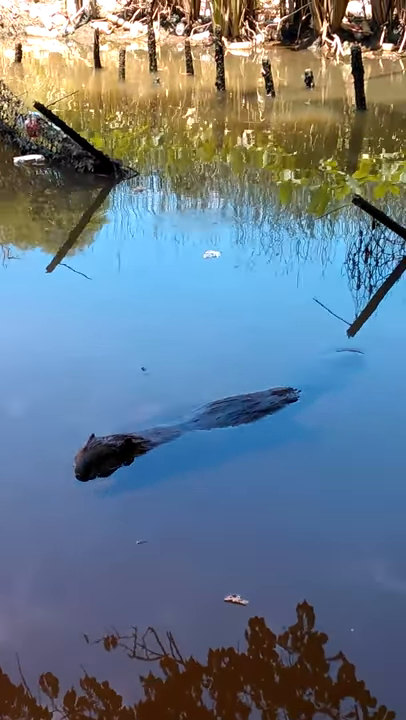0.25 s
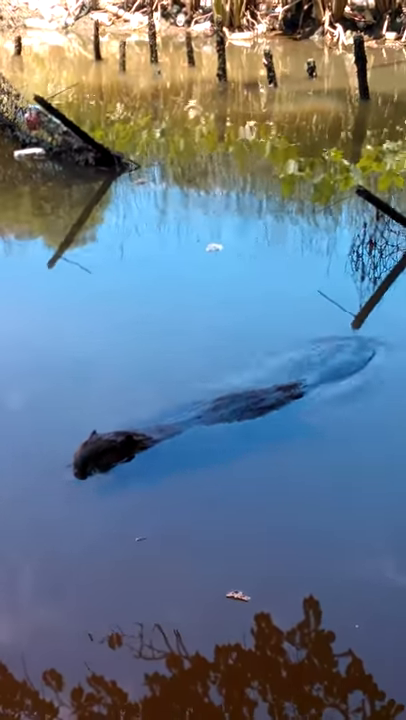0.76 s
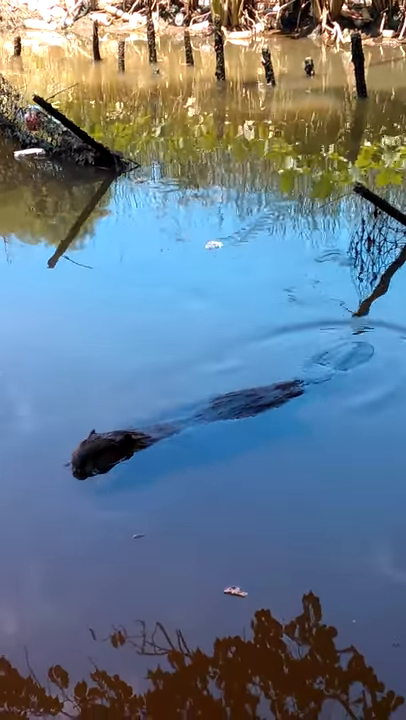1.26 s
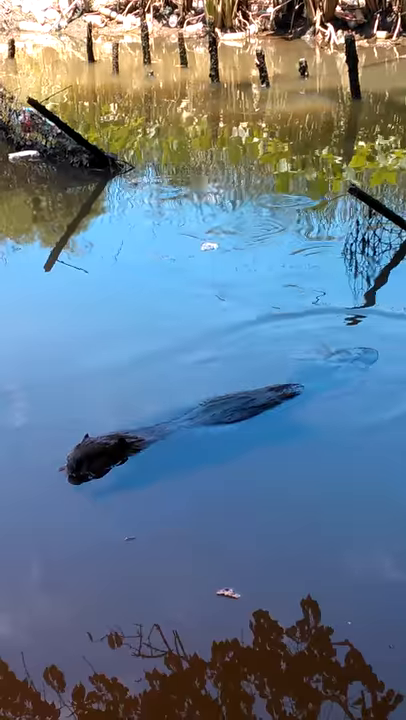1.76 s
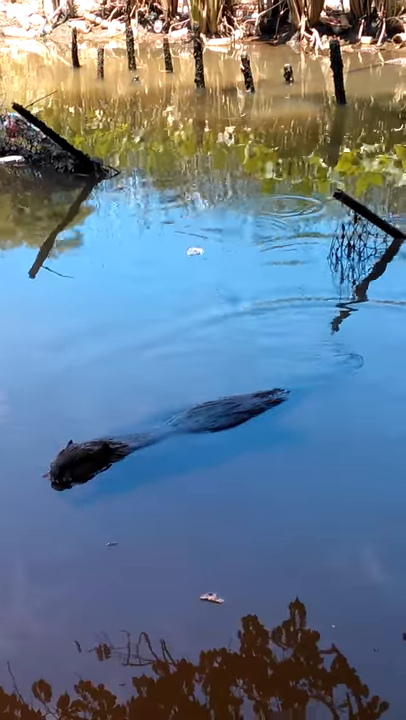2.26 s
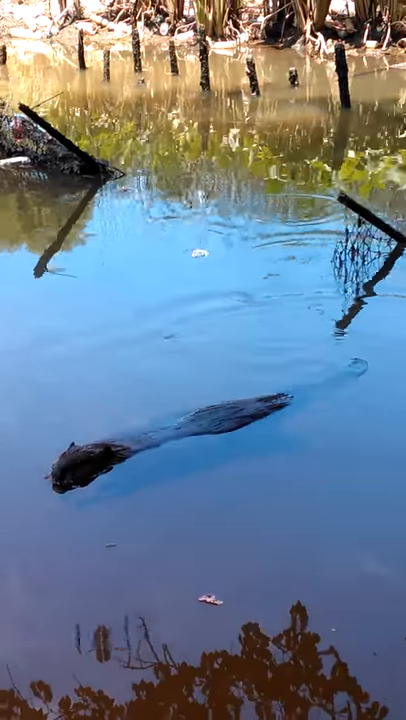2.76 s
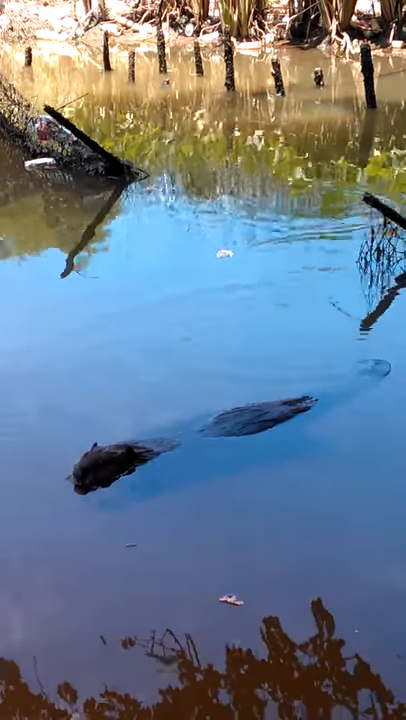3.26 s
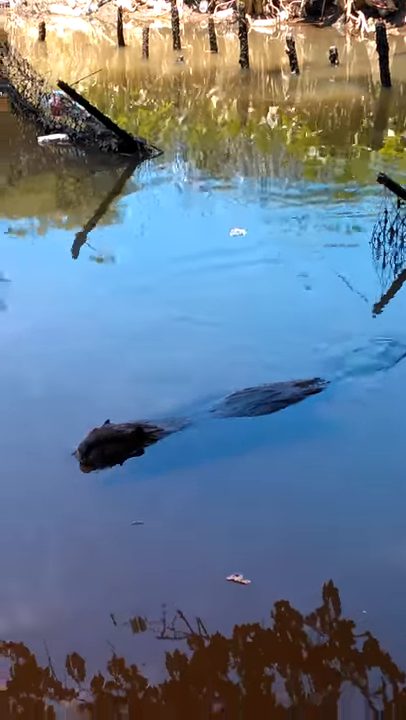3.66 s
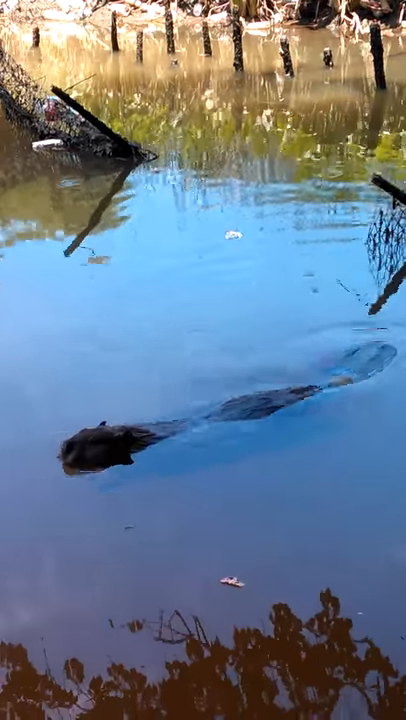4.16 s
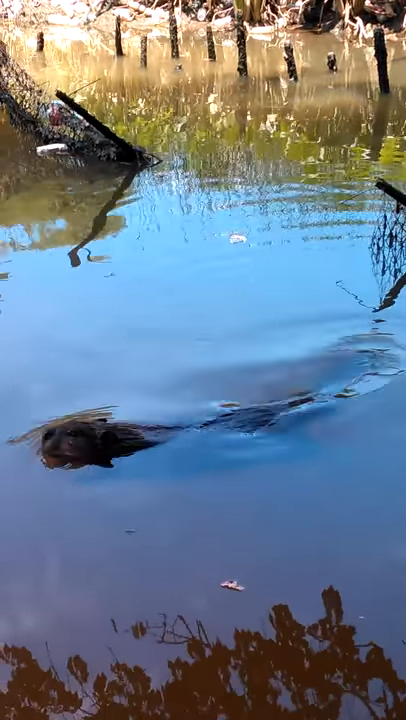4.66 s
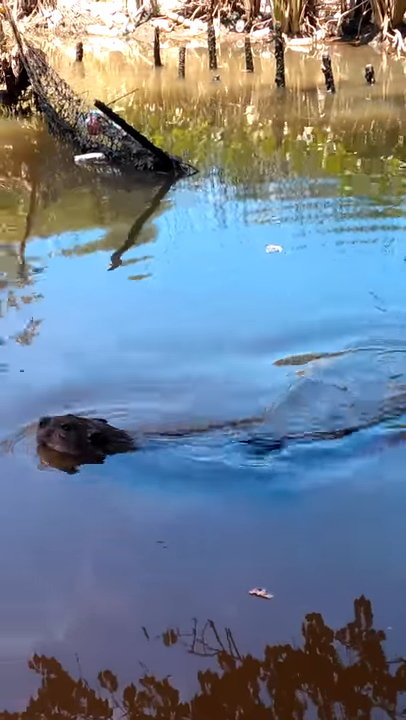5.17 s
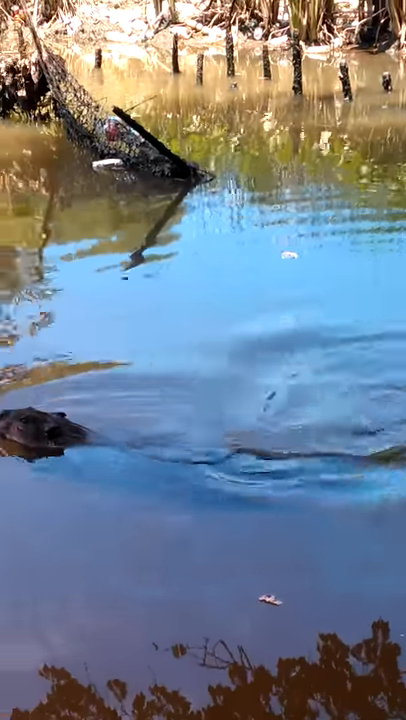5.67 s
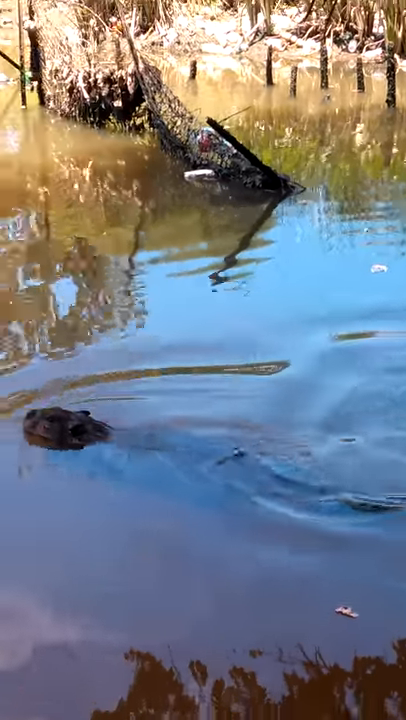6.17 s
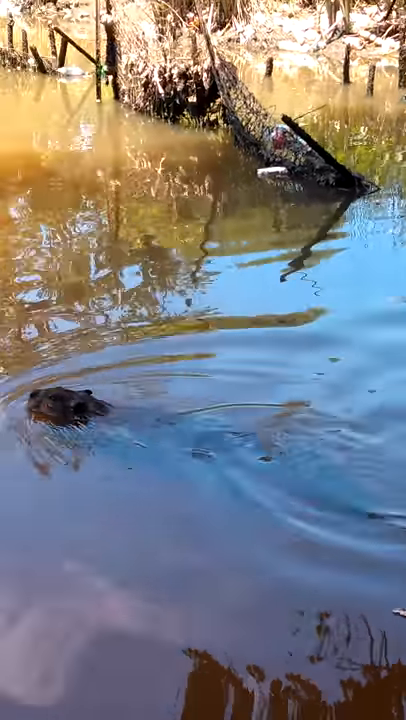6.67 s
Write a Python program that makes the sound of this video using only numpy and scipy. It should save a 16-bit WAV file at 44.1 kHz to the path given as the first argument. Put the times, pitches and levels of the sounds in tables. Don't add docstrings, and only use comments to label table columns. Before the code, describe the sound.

Far traffic drones deeply beside a quiet pond while small birds whistle, chirp and trill faintly, and a finger clatters the phone's case.

```python
import sys
import numpy as np
from scipy import signal
from scipy.fft import rfft, irfft, next_fast_len
from scipy.io import wavfile
from scipy.ndimage import uniform_filter1d

SR = 44100
rng = np.random.default_rng(int(sys.argv[2]) if len(sys.argv) > 2 else 0)


def master_out(mix):
    frames = np.transpose(np.atleast_2d(mix))
    ceiling = np.clip(frames, -1, 1)
    pcm = np.round(ceiling * 32767).astype(np.int16)
    wavfile.write(sys.argv[1], SR, pcm)


def elevation(decibels):
    levels = np.asarray(decibels, float)
    return 10 ** (levels / 20)


N = 305172
T = np.arange(N) / SR


def walk(rate):
    hold = int(SR / rate)
    steps = np.repeat(rng.standard_normal(N // hold + 1), hold)
    return 2.14 * uniform_filter1d(uniform_filter1d(steps, hold), hold)[:N]


def noise(points):
    size = next_fast_len(N)
    hz, db = np.transpose(points)
    bins_hz = np.arange(size // 2 + 1) * SR / size
    gain = elevation(np.interp(np.log(bins_hz + 1), np.log(hz), db))
    y = irfft(rfft(rng.standard_normal(size)) * gain, size)[:N]
    return y / y.std()


# [f/Hz, level/dB per Hz]
HISS = [(1530, -17.5), (2600, -1), (3350, -0.5), (4450, -6), (8650, -4.5), (9900, -10), (14500, -13.5),
        (15500, -11)]


def microphone_hiss():
    return elevation(-61 + 0.033 * walk(1.8)) * noise(HISS)


# [f/Hz, level/dB per Hz]
ROAD_COLOUR = [(15, -30), (25, -23), (53, -1), (80, -2.5), (144, -11), (178, -14.5), (238, -16), (594, -30),
               (842, -29.5), (1000, -24.5), (1130, -24.5), (1340, -27), (2060, -39), (2600, -44), (3380, -57),
        (5720, -120)]


def road():
    whole = noise(ROAD_COLOUR)
    low_pass = signal.butter(2, 450, fs=SR, output="sos")
    low = signal.sosfilt(low_pass, whole[::-1])[::-1]
    low = signal.sosfilt(low_pass, low)
    swell = elevation(0.11 * walk(1.47))
    leaving_db = 1.5 * np.exp(-T / 2.1)
    extra = elevation(leaving_db - 1.2 + 0.6 * walk(2.86))
    return elevation(-39) * swell * (whole - low + extra * low)


def pull(loudest, heard, hz, climb_hz, db, fall_db):
    away = np.linspace(-1, 1, num=21)
    fall = fall_db * np.abs(away) ** 3.4
    return np.transpose([loudest + heard * away, hz + climb_hz * heard * away, db - fall])


def hum(track, orders, flutter_db):
    s, hz, db = np.transpose(track)
    turn = 2 * np.pi * np.cumsum(np.interp(T, s, hz)) / SR
    rise = T - s[0] + (s[0] == 0)
    fall = s[-1] - T + (s[-1] > 6.85)
    fade = np.clip(np.minimum(rise, fall) / 0.12, 0, 1)
    lines = sum(elevation(g + flutter_db * walk(6)) * np.sin(k * turn + rng.uniform(0, 2 * np.pi)) for k, g in orders)
    return np.sqrt(2) * lines * fade * elevation(np.interp(T, s, db))


# [loudest at t/s, heard before and after t/s, f/Hz, climb f/Hz per s, level/dB]
WHINES = [(.22, .42, 145, 10, -43), (4.35, .5, 130.8, 1, -47), (5.4, .6, 131, 0, -50),
          (5.1, .9, 228.5, 0, -57), (6.25, .6, 533, -8, -63.5), (1.9, .55, 134, 0, -53),
          (1.4, .35, 110, 0, -54), (3.0, .45, 136, 0, -52), (3.2, .78, 159, 2, -54),
          (2.55, .4, 248.5, 3, -57), (4.3, .5, 261, 6, -60), (5.05, .22, 528, 9, -65),
          (5.75, .4, 238.5, -5, -60), (6.85, .6, 241, 8, -50.5), (6.4, .35, 587, 25, -63)]


def whines():
    return sum(hum(pull(*w, fall_db=7), [(1, 0)], flutter_db=1.8) for w in WHINES)


# [loudest at t/s, heard before and after t/s, firing f/Hz, climb f/Hz per s, level/dB]
PULLS = [
    (.28, .66, 72.8, 6.5, -36),
    (2.4, .9, 69.4, 1.9, -40),
    (2.95, .8, 73.4, 2.4, -42),
    (4.8, 1.1, 76.6, 1.1, -39),
    (6.3, .62, 78.4, 1.9, -38),
    (2.6, .8, 62.9, 1.6, -41),
    (4.7, 1.05, 69.7, 5.7, -33.8),
    (2.5, 1.1, 58.7, 0, -45.5),
    (1.3, .5, 81, 0, -45),
    (3.6, .35, 63, 3, -44),
]
# [t/s, firing f/Hz, level/dB]
LORRY = [
    (5.8, 65.9, -30),
    (6.0, 67.5, -47.5),
    (6.25, 67.8, -40),
    (6.92, 68.53, -38),
]
# [multiple of the firing rate, level/dB]
LORRY_ORDERS = [(1, 2.5), (1.5, -6), (2, -12.5), (2.5, -19.5), (3, -15.5), (4, -19), (4.5, -19.5), (5, -35),
                (6, -25.5)]


def engines():
    far = sum(hum(pull(*p, fall_db=9), [(1, 0.014)], flutter_db=0.1) for p in PULLS)
    return far + hum(LORRY, LORRY_ORDERS, flutter_db=0.0)


# [t/s, peak level/dB, ring f/Hz, ring width f/Hz]
TICKS = [(2.3746, -52, 12000, 5000), (3.6203, -49, 9100, 5960), (5.0785, -40, 3600, 2520),
         (5.0788, -45, 8800, 3000), (5.1033, -47, 5540, 2485), (5.1236, -35, 6500, 3500),
         (5.1253, -34.5, 4500, 5000), (5.1252, -37, 9400, 6000), (5.1276, -48, 5000, 2500),
         (5.1318, -46, 7000, 5000), (5.194, -54, 3000, 1500), (5.329, -51, 11030, 2970),
         (5.8118, -49, 10810, 5000), (6.36, -47, 10000, 6040), (6.468, -54, 4500, 3000),
         (6.5117, -46, 12000, 2490)]
# [t/s, length t/s, level/dB]
RUBS = [
    (5.11, 0.1, -64),
    (6.364, 0.18, -69),
]


def handling():
    ticks, lag = np.zeros(N), np.arange(200) / SR
    for s, db, hz, width_hz in TICKS:
        i, u = int(s * SR), np.pi * width_hz * lag
        push = 4.1 * u * np.exp(-u)
        ticks[i:i + 200] += elevation(db) * push * np.sin(2 * np.pi * hz * lag)
    rattle = elevation(-27) * rng.standard_normal(400) * np.exp(-np.arange(400) / SR / 0.0015)
    grains = noise([(3000, -30), (7000, -6), (9000, 0), (12000, -3), (15000, -8)]) * elevation(1.5 * walk(120))
    strokes = 0
    for s, length, db in RUBS:
        strokes += elevation(db) * np.abs(np.sin(np.pi * np.clip((T - s) / length, 0, 1))) ** 0.5
    return ticks + signal.fftconvolve(ticks, rattle)[:N] + grains * strokes


def sing(phrase, events):
    return [(s + delay * np.prod(slow), length * np.prod(slow), k * hz0, k * hz1, k * hz2, db + g)
            for s, k, db, *slow in events
            for delay, length, hz0, hz1, hz2, g in phrase]


def bird(strokes, wobble_hz, octave_db, wet_db, t60):
    y = np.zeros(N + SR)
    jitter = signal.sosfilt(signal.butter(2, 400, fs=SR, output="sos"), rng.standard_normal(N + SR))
    jitter *= wobble_hz / jitter.std()
    for s, length, hz0, hz1, hz2, db in strokes:
        i, n = int(s * SR), int(length * SR)
        u = np.arange(n) / n
        hz = hz0 * (1 - u) * (1 - 2 * u) + hz1 * 4 * u * (1 - u) + hz2 * u * (2 * u - 1)
        turn = 2 * np.pi * np.cumsum(hz + jitter[i:i + n]) / SR
        swell = 1.79 * np.sin(np.pi * u) ** 0.3
        y[i:i + n] += elevation(db) * swell * (np.sin(turn) + elevation(octave_db) * np.sin(2 * turn))
    lag = np.arange(SR // 2) / SR
    echo = rng.standard_normal(len(lag)) * np.exp(-np.log(1000) * lag / t60) * (lag > 0.004)
    echo *= elevation(wet_db) / np.sqrt(np.sum(echo ** 2))
    return y[:N] + signal.fftconvolve(y[:N], echo)[:N]


# [t/s, length t/s, start f/Hz, end f/Hz, level/dB]
CHUCKS = [(2.105, .018, 3200, 3080, -66), (2.12, 0.018, 3460, 2400, -62), (2.141, .018, 3200, 3100, -68),
          (2.255, 0.018, 2900, 2900, -72), (2.283, 0.021, 3180, 3020, -63), (3.49, 0.022, 1980, 1850, -60),
          (3.832, .016, 3620, 3000, -64), (3.936, .028, 3800, 4260, -69), (4.027, 0.03, 3930, 4150, -69),
          (5.843, 0.026, 2070, 1900, -60), (6.878, .02, 3800, 3183, -67), (6.879, 0.026, 3120, 2780, -60),
          (6.887, 0.029, 3570, 2610, -61)]


def chucks():
    strokes = [(s, length, hz0, (hz0 + hz2) / 2, hz2, db) for s, length, hz0, hz2, db in CHUCKS]
    return bird(strokes, wobble_hz=200, octave_db=-35, wet_db=-1, t60=0.35)


# [delay t/s, length t/s, start f/Hz, middle f/Hz, end f/Hz, level/dB]
SLUR = [
    (0, .095, 3440, 3210, 3240, 0),
    (.085, 0.1, 3210, 3360, 3455, -4.5),
]
LEAD_IN = [(0, 0.0444, 3560, 3540, 3420, 0)]
# [t/s, pitch factor, level/dB, length factor]
WHISTLES = [
    (.148, .99, -62, 0.97),
    (1.76, 1, -64, 0.88),
    (3.93, 1.02, -62, 0.97),
    (5.38, 1.005, -61, .92),
    (6.52, 1.01, -74, 0.91),
]
# [t/s, pitch factor, level/dB]
LEAD_INS = [
    (1.72, 1, -70),
    (3.895, 1, -68),
    (5.348, 0.997, -62.5),
]


def whistler():
    strokes = sing(SLUR, WHISTLES) + sing(LEAD_IN, LEAD_INS)
    return bird(strokes, wobble_hz=20, octave_db=-35, wet_db=-1, t60=0.42)


# [delay t/s, length t/s, start f/Hz, middle f/Hz, end f/Hz, level/dB]
TRILL_NOTE = [(0, 0.0307, 2800, 2850, 3100, 0)]
DIP = [(0, 0.0275, 2200, 2150, 2180, 0)]
# [t/s, pitch factor, level/dB]
DIPS = [
    (3.62, 1, -62),
    (3.75, 1, -64),
    (3.851, 1.17, -60),
]
TRILL = [(3.944, 1.01, -60), (4.046, 1.04, -62), (4.15, .98, -61), (4.249, 1.02, -62), (4.345, 1.03, -59),
         (4.448, 1.07, -60.5), (4.558, 1.025, -62.5), (4.665, 1.015, -64.5), (4.785, 1.04, -63.5)]


def warbler():
    strokes = sing(TRILL_NOTE, TRILL) + sing(DIP, DIPS)
    return bird(strokes, wobble_hz=80, octave_db=-35, wet_db=2, t60=0.5)


# [delay t/s, length t/s, start f/Hz, middle f/Hz, end f/Hz, level/dB]
TSIP = [
    (0, .025, 5150, 5320, 5580, -7),
    (.002, 0.0305, 5860, 6050, 6200, -17),
    (.004, .031, 6220, 7140, 7800, -1),
]
ARC = [
    (0, .082, 6070, 5984, 5020, -0.5),
    (.01, 0.046, 7180, 7400, 7160, -8),
]
DOUBLE_TSIP = [
    (0, 0.033, 5520, 5700, 5700, 1),
    (.004, 0.035, 5970, 6460, 7050, -2),
]
DOUBLE_ARC = [
    (.028, .062, 5780, 5940, 5150, 1),
    (.035, 0.037, 6500, 6550, 6370, -2.5),
    (.08, .058, 6200, 6000, 5100, 0.5),
]
# [t/s, tsip pitch factor, tsip level/dB, arc after t/s, arc level/dB]
FAR_CHIRPS = [
    (.836, 1.07, -61, 0.036, -61),
    (1.365, .99, -63, 0.048, -65),
]
NEAR_CHIRPS = [
    (4.258, 1, -57.5, .045, -58.5),
    (6.358, 1, -57, .05, -58),
]
# [t/s, pitch factor, level/dB]
DOUBLE_CHIRPS = [
    (2.673, .995, -65),
    (5.157, 1.005, -65.5),
]
HOARSE_TSIPS = [(0.828, 1.01, -61)]


def arcs(phrase, chirps):
    return sing(phrase, [(s + after, 1, db) for s, _, _, after, db in chirps])


def sparrows():
    tsips = sing(TSIP, [chirp[:3] for chirp in FAR_CHIRPS + NEAR_CHIRPS])
    tsips += sing(DOUBLE_TSIP, DOUBLE_CHIRPS + HOARSE_TSIPS)
    near = arcs(ARC, NEAR_CHIRPS)
    far = arcs(ARC[:1], FAR_CHIRPS)
    far += sing(DOUBLE_ARC, DOUBLE_CHIRPS)
    return (bird(tsips, wobble_hz=350, octave_db=-30, wet_db=-2, t60=0.45)
            + bird(near, wobble_hz=80, octave_db=-19, wet_db=-2, t60=0.45)
            + bird(far, wobble_hz=120, octave_db=-30, wet_db=4, t60=0.7))


def scene():
    traffic = road() + whines() + engines()
    birds = chucks() + whistler() + warbler() + sparrows()
    return (microphone_hiss() + traffic + handling() + birds)[None]


def top_cut(x):
    return signal.sosfilt(signal.butter(12, 15640, fs=SR, output="sos"), x)


def record(dry):
    x = signal.sosfilt(signal.butter(4, 38, "high", fs=SR, output="sos"), dry)
    mix = signal.sosfilt(signal.ellip(10, 0.2, 70, 15650, fs=SR, output="sos"), x)
    return top_cut(mix)


dry = scene()
out = record(dry)
master_out(out)
```